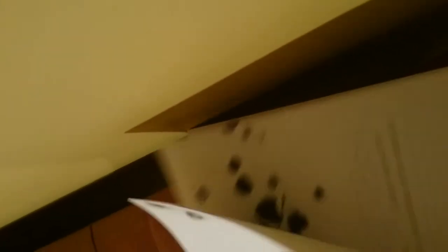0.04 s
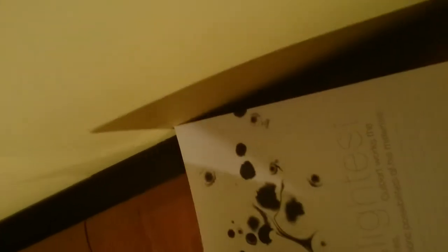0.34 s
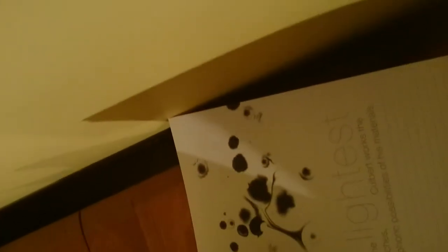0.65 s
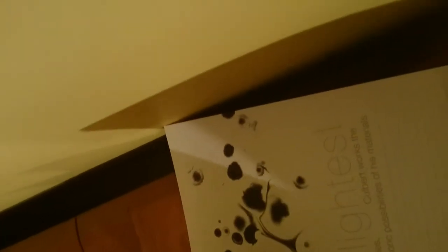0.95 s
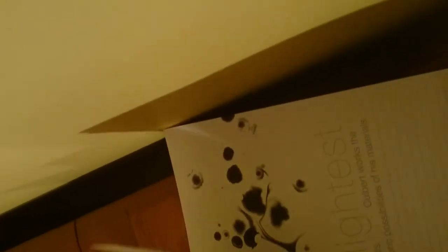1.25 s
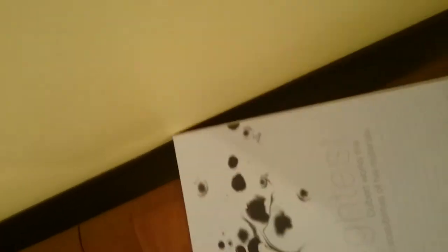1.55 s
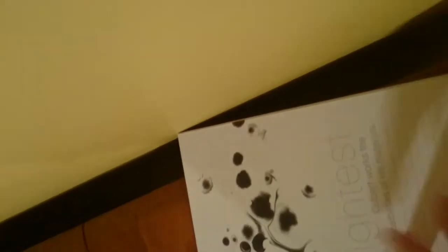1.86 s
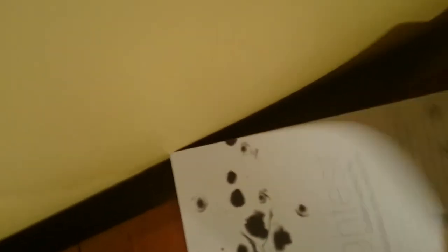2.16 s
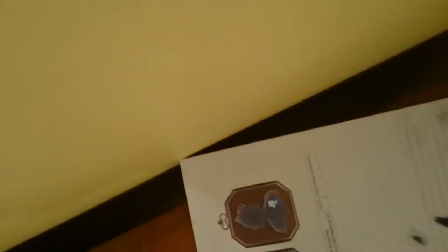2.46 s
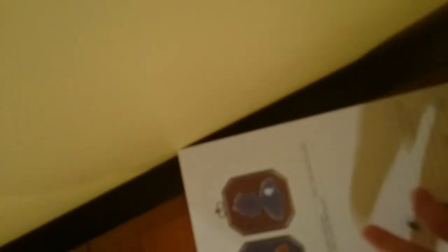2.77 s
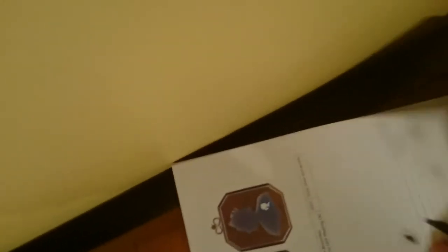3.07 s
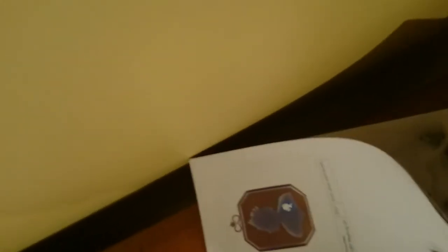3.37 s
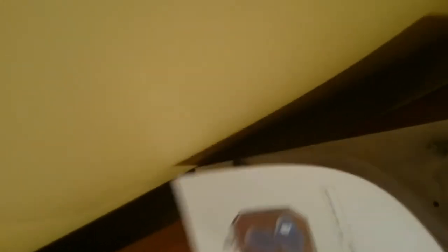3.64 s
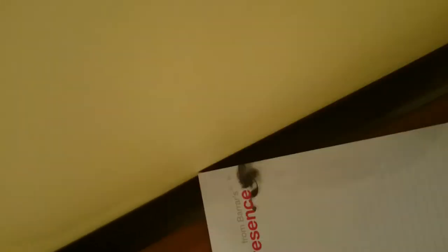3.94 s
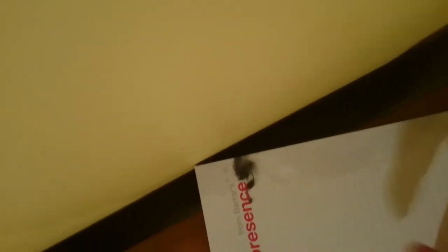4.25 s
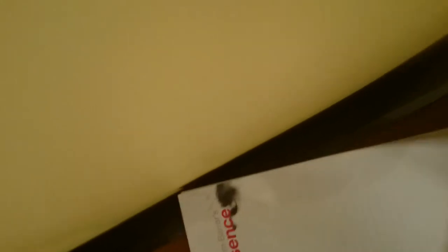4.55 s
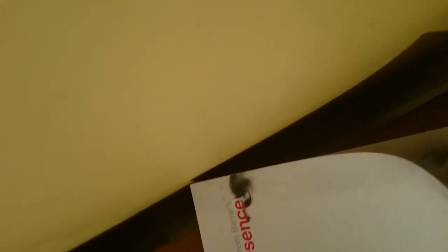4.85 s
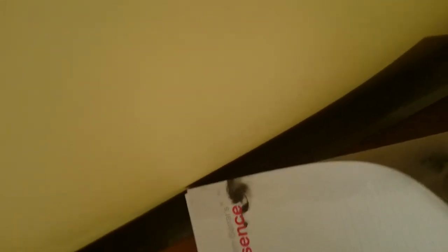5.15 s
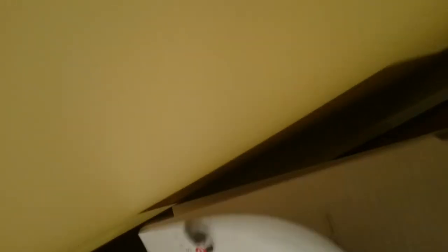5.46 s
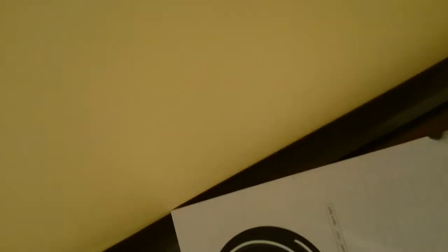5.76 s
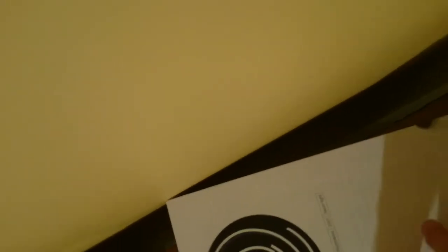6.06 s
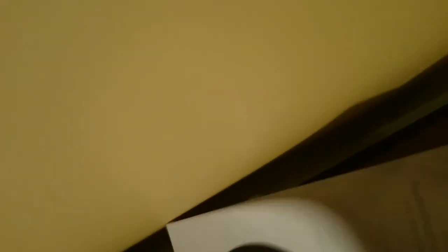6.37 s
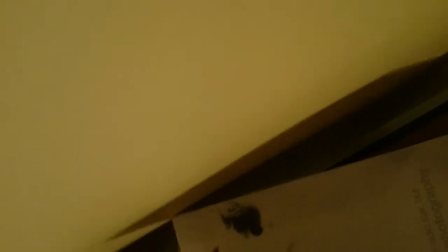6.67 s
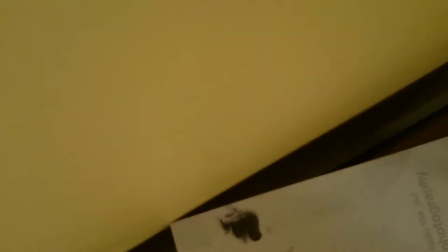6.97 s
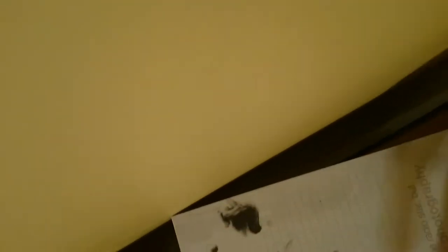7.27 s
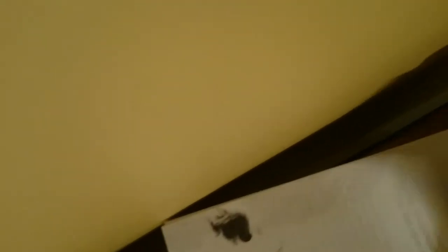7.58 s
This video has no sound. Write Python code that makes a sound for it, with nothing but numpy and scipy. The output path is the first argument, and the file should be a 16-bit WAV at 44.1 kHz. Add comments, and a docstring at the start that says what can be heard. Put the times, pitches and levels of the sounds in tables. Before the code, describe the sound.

Close paper swishes and sharp crackles as someone leafs through a magazine on a table, with soft puffs of air.

```python
"""A quiet room, a small camera close to a wooden table where the pages of a magazine are turned.
Each sheet slides off its neighbour with a grainy hiss, scrapes and brushes past, buckles with snaps
and lands on a hollow pocket of air; glossy paper sticks and slips in squeaks. Soft thumps, puffs and
drifts of air reach mainly the right microphone, whose port also rings in the treble.
Faint room tone and mains hum lie underneath."""
import sys
import numpy as np
from scipy import signal
from scipy.fft import rfft, irfft, next_fast_len
from scipy.io import wavfile
from scipy.ndimage import uniform_filter1d, map_coordinates

SR = 44100
rng = np.random.default_rng(int(sys.argv[2]) if len(sys.argv) > 2 else 0)


def transcribe(u):
    """Save the signal u as a 16-bit wav file named by the first command-line argument.

    u: samples, shape (n,) or (channels, n), limited to [-1, 1]; the rate is SR.
    q: integer samples, one column per channel.
    """
    v = np.clip(np.atleast_2d(u).T, -1, 1)
    q = np.round(v * 32767).astype(np.int16)
    wavfile.write(sys.argv[1], SR, q)


N = 340009


def amp(db):
    """Decibels to gain."""
    return 10 ** (np.asarray(db) / 20)


def unit(x):
    """Scale to rms 1."""
    return x / np.sqrt(np.mean(x ** 2) + 1e-20)


def along(points, hz):
    """Read (f/Hz, value) points on a log frequency axis."""
    f, values = np.transpose(points)
    return np.interp(np.log(hz + 1), np.log(f + 1), values)


def wobble(rate):
    """A smooth random curve with rate knots a second."""
    return map_coordinates(rng.standard_normal(N // 4), [np.arange(N) * rate / SR], mode="wrap")


def filtered(x, response):
    """Filter x by a response given as a function of f/Hz."""
    size = next_fast_len(N + SR // 2)
    return irfft(rfft(x, size) * response(np.fft.rfftfreq(size, 1 / SR)), size)[..., :N]


def noise(spectrum, channels=1):
    """Coloured noise of rms 1."""
    white = rng.standard_normal((channels, N))
    return unit(filtered(white, lambda hz: amp(along(spectrum, hz))))


def coloured(x, spectrum, size=2048):
    """Minimum-phase colouring that keeps the power of white noise."""
    cepstrum = irfft(np.log(amp(along(spectrum, np.fft.rfftfreq(size, 1 / SR)))))
    causal = 2 * cepstrum[:size // 2] * (np.arange(size // 2) > 0)
    response = irfft(np.exp(rfft(causal, size)))
    return signal.fftconvolve(x, response[None] / np.linalg.norm(response), axes=1)[:, :N]


def spread(pair):
    """Two unrelated signals become left and right, alike in the bass."""
    # likeness of the paper at the two microphones: f/Hz, coherence
    coherence = [(100, 1), (400, 0.45), (1200, 0.15), (3000, .15), (10000, .1)]
    angle = lambda hz: np.arccos(np.clip(along(coherence, hz), -1, 1)) / 2
    mid, side = filtered(pair, lambda hz: np.array([np.cos(angle(hz)), np.sin(angle(hz))]))
    return np.array([mid + side, mid - side])


def add(track, s, sound):
    """Mix a sound into a track at s seconds."""
    part = track[..., max(0, round(s * SR)):][..., :sound.shape[-1]]
    part += sound[..., :part.shape[-1]]


def stroke(t, length, rise, fall):
    """A contact that swells, holds for its length and dies away."""
    return (1 - np.exp(-(t / rise) ** 2)) * np.exp(-np.maximum(t - length, 0) / fall)


def shares(flap_db, rub_db, hiss_db, taut_db):
    """Force on the four paper voices; tension moves the rub from the slack voice to the taut one."""
    tension = np.arctan(amp(taut_db))
    return (amp([flap_db, rub_db, rub_db, hiss_db]) * [1, np.cos(tension), np.sin(tension), 1])[:, None]


def contact(flap_db, rub_db, hiss_db):
    """Force of a short contact: the more a sheet hisses over its flap, the tauter it is."""
    return shares(flap_db, rub_db, hiss_db, taut_db=-1.5 + 0.21 * (hiss_db - flap_db))


def voiced(force):
    """Force drives four voices: the whole sheet flaps, it rubs slack or taut, its fibres hiss."""
    # spectrum of each voice: f/Hz, relative density/dB
    flap = [(20, -19), (60, -4), (170, -0.5), (310, 6.5), (450, -8.5), (620, -1), (850, -4), (1200, -4.5),
            (1700, -25.5), (3500, -55.5)]
    slack = [(300, -62), (950, -8.5), (1450, -2.5), (1950, 2), (2700, 2), (3300, 0), (6000, -49.5)]
    taut = [(1200, -49.5), (2400, -7.5), (3000, 5), (4300, -0.5), (5600, -3), (6500, -10.5), (10000, -47)]
    hiss = [(2500, -59), (5000, -9), (6100, -6.5), (7400, -3), (8700, 2.5), (9800, -1.5), (11400, -3.5),
            (12600, -8), (13800, -9), (15000, -16), (16000, -27)]
    return sum(coloured(drive, voice) for drive, voice in zip(force, (flap, slack, taut, hiss)))


def room_tone():
    """The faint steady noise of the room, a little louder on the right."""
    # noise floor: f/Hz, relative density/dB
    spectrum = [(25, -12.5), (55, 4), (80, 1), (250, -9.5), (315, -6), (390, -11), (600, -14.5),
                (1500, -23.5), (3500, -25.5), (6300, -36.5), (9500, -29.5), (14500, -35)]
    return noise(spectrum, channels=2) * amp([[-65], [-62]])


def mains_hum(hz=100, level_db=-77):
    """A faint mains hum in the room, slightly unsteady."""
    return amp(level_db + wobble(3)) * np.sqrt(2) * np.sin(2 * np.pi * hz * np.arange(N) / SR)


def air():
    """Soft puffs and a slow drift of pressure, nearly all on the right microphone."""
    # air pushed by a page onto the microphone: t/s, length/s, level/dB
    puffs = [(0.24, 0.045, -55), (0.46, 0.079, -40), (1.292, 0.11, -50), (2.053, 0.041, -51),
             (2.33, 0.14, -48), (2.475, 0.055, -57), (2.935, 0.094, -40.5), (3.86, 0.044, -39.5),
             (5.099, 0.041, -39.5), (5.44, 0.067, -42), (5.577, 0.044, -55), (5.772, 0.036, -43),
             (6.223, 0.11, -47), (6.533, 0.058, -43), (6.76, 0.064, -36), (6.9, 0.056, -43.5),
             (7.14, 0.063, -46.5)]
    # strength of the drift: t/s, level/dB
    drift_levels = [(0, -8), (.3, -14), (.7, -25.5), (1.1, -20.5), (1.7, -19), (2, -9), (2.3, -19),
                    (3, -12.5), (3.8, -19.5), (4.4, -12.5), (5, -20.5), (5.6, -15), (6.4, -17), (7.7, -8.5)]
    # spectra of puffs and drift: f/Hz, relative density/dB
    puff_spectrum = [(12, -1.5), (30, -2), (60, -0.5), (110, -5), (180, -23.5), (350, -35), (1000, -82.5)]
    drift_spectrum = [(.7, -12.5), (2.5, 7.5), (6, -10.5), (10, 0.5), (14, -17), (20, -22.5), (32, -42.5),
                      (45, -57.5), (90, -55.5), (250, -77.5), (1000, -120)]
    push, t = np.zeros(N), np.arange(SR // 3) / SR
    for s, length, db in puffs:
        add(push, s, amp(db) * stroke(t, length / 2, rise=0.015, fall=0.035))
    drift_db = np.interp(np.arange(N) / SR, *np.transpose(drift_levels))
    drift = unit(np.tanh(noise(drift_spectrum)[0] / np.pi)) * amp(drift_db)
    return push * noise(puff_spectrum) * amp([[-22], [1]]) + drift * amp([[-54], [0]])


def friction(grain_db, flutter_db):
    """Stereo noise of rms 1 in tiny slips, clumped as the contact flutters."""
    hiss = spread(rng.standard_normal((2, N)))
    return unit(hiss * amp(grain_db * wobble(1400) + flutter_db * wobble(90)))


def crinkle(rate, life_s, size_db):
    """Envelope of random tiny creases giving way; a few are much bigger than the rest."""
    kicks = (rng.random(N) < rate / SR) * amp(size_db * np.minimum(rng.exponential(size=N), 3))
    return signal.lfilter([1], [1, -np.exp(-1 / (life_s * SR))], kicks)


def sliding(fade_db=21, fade_curve=1.26):
    """Each slide gathers speed, holds and slows; light touches tick, and a slack sheet crackles."""
    # a sheet slides over its neighbour; the last row is only a brief burst of noise at the very end: # t/s at
    # full speed, rise/s, hold/s, fall/s, flap/dB, rub/dB, hiss/dB, taut over slack/dB
    slides = [(0, 0.068, 0.24, .1, -67, -68, -68.5, -0.5), (0.24, 0.076, .01, 0.16, -57, -59.5, -60, 7),
              (0.491, 0.071, 0.08, 0.093, -57, -45.5, -35.5, 8.5),
              (0.585, .06, 0.087, 0.053, -60, -48, -46.5, 9.5),
              (0.97, 0.2, 0.019, 0.097, -63, -60, -63.5, -7),
              (1.112, 0.054, 0.0085, 0.017, -62, -50.5, -54, 1.5),
              (1.149, 0.013, 0.043, 0.069, -63.5, -52, -56, 4),
              (1.322, 0.071, 0.019, .06, -80, -69.5, -69.5, 2),
              (1.487, 0.038, 0.062, 0.12, -64.5, -57, -57.5, -2.5),
              (1.597, 0.041, 0.04, 0.058, -52, -44.5, -40.5, 1),
              (1.953, 0.022, 0.03, 0.47, -70, -67, -80, -1),
              (2.291, 0.16, 0.0085, 0.13, -65, -55, -41.5, 7),
              (2.292, 0.0096, 0.0064, 0.15, -54, -50, -47.5, 2.5),
              (2.421, 0.13, 0.089, 0.13, -54, -51, -57.5, 1),
              (3.202, 0.29, 0.012, 0.23, -78, -59.5, -56.5, 0.5),
              (3.476, 0.093, 0.022, 0.1, -62.5, -59, -65, -2), (3.548, 0.03, 0.09, 0.06, -66, -63, -62, -1),
              (3.685, 0.023, 0.086, 0.049, -57.5, -35.5, -36.5, 4),
              (3.909, 0.064, 0.06, 0.11, -44.5, -42.5, -45.5, 3),
              (4.686, 0.17, 0.015, 0.086, -76, -56.5, -53.5, 1),
              (4.752, 0.028, 0.01, 0.18, -67.5, -56, -57, 0.5),
              (5.45, 0.14, 0.1, 0.11, -58, -49.5, -56.5, 0),
              (5.664, 0.11, 0.11, 0.17, -54, -54.5, -56.5, 1.5),
              (6.213, 0.057, 0.038, 0.13, -72, -72, -62, -1), (6.415, 0.1, 0.033, 0.23, -69, -58, -46, 7),
              (6.56, 0.31, 0.081, 0.083, -61, -56.5, -58, 2.5),
              (6.77, 0.083, 0.053, 0.12, -56, -53, -72, -0.5),
              (7.032, 0.17, 0.11, 0.098, -53.5, -51, -56.5, 1.5),
              (7.554, 0.053, 0.018, 0.11, -72.5, -65, -56.5, -2), (7.7, 0.072, .01, .05, -58, -59, -48, 4)]
    # a page that is only held: flap/dB, rub/dB, hiss/dB
    held = [-82.5, -88.5, -77]
    t = np.arange(N) / SR
    power = shares(*held, taut_db=1.0) ** 2
    for s, rise, hold, fall, *db in slides:
        away = np.maximum((s - t) / rise, 0) + np.maximum((t - s - hold) / fall, 0)
        swell = amp(-fade_db * np.minimum(away, 5) ** fade_curve)
        power = power + (shares(*db) * swell) ** 2
    flap, hiss = power[0], power[-1]
    lightness = np.clip((-44 - 10 * np.log10(hiss)) / 14, .15, 1)
    ticks = .8 * lightness * crinkle(rate=40, life_s=.0008, size_db=4)
    slack = flap / (flap + hiss)
    crackle = 1.5 * slack * crinkle(rate=110, life_s=.0009, size_db=3)
    return np.sqrt(power * (1 - slack / 2 + ticks ** 2 + crackle ** 2))


def bending(x, depth_db, size=256):
    """As the sheet bends, its resonances and reflections wander across the spectrum."""
    spectra = signal.stft(x, nperseg=size)[2]
    ripple = rng.standard_normal(spectra.shape)
    for axis, width in ((1, 3), (2, 40), (2, 20)):  # smooth over frequency, then twice over time
        ripple = uniform_filter1d(ripple, width, axis)
    return signal.istft(spectra * unit(amp(depth_db * unit(ripple))), nperseg=size)[1][:, :N]


def scrapes():
    """A taut sheet dragged across an edge hisses in a narrow resonance that moves as it bends."""
    # drags across an edge: t/s, length/s, start f/Hz, end f/Hz, width/Hz, level/dB
    drags = [(0.043, 0.02, 5670, 5450, 1200, -57.5), (0.139, 0.028, 5400, 5430, 700, -60.5),
             (0.432, 0.063, 5160, 4690, 1400, -45.5), (0.549, 0.12, 3000, 2286, 1300, -54.5),
             (0.469, 0.12, 4520, 3380, 1900, -47), (0.49, 0.082, 10900, 10560, 1300, -48),
             (0.903, 0.085, 3690, 3620, 1500, -59), (1.474, 0.033, 3900, 3870, 1000, -56),
             (1.584, 0.036, 2750, 3004, 700, -45), (1.594, 0.031, 4300, 5000, 2200, -34.5),
             (1.597, 0.031, 9140, 9860, 1200, -29.5), (1.657, 0.015, 9300, 9260, 1000, -44),
             (2.264, 0.072, 6360, 5780, 1400, -50.5), (2.291, 0.026, 2675, 2720, 900, -50.5),
             (2.425, 0.032, 5500, 4400, 2000, -46), (2.508, 0.021, 9060, 8650, 1000, -47),
             (3.127, 0.12, 6050, 6020, 1300, -65), (3.453, 0.0074, 5220, 5630, 1100, -50.5),
             (3.67, 0.026, 9200, 9100, 1600, -42.5), (4.61, 0.17, 6020, 5900, 900, -64),
             (5.356, 0.023, 5920, 5680, 1600, -35), (5.35, 0.02, 9500, 8340, 2200, -33.5),
             (5.583, 0.018, 9360, 8320, 2600, -39), (6.386, 0.21, 9900, 9300, 1500, -49),
             (7.105, 0.027, 7100, 6900, 800, -52)]
    out, t = np.zeros((2, N)), np.arange(SR // 3) / SR
    for s, length, start_hz, end_hz, width_hz, db in drags:
        phase = 2 * np.pi * np.cumsum(np.interp(t, [0, length], [start_hz, end_hz])) / SR
        lowpass = signal.butter(2, width_hz / 2, fs=SR)
        in_phase, quadrature = signal.lfilter(*lowpass, rng.standard_normal((2, 2, len(t))))
        band = unit(in_phase * np.cos(phase) + quadrature * np.sin(phase))
        add(out, s, amp(db) * stroke(t, length, rise=0.082 * length, fall=0.15 * length) * band)
    return spread(out)


def buckled(force, ring_hz, edge_hz, ring_db=1.5, ring_q=6.7):
    """The patch that flips rings at a pitch set by its size; a softer fold has less treble."""
    patch = signal.lfilter(*signal.iirpeak(ring_hz, ring_q, fs=SR), force)
    soften = signal.butter(4, edge_hz, fs=SR, output="sos")
    return signal.sosfilt(soften, force + amp(ring_db) * patch)


def snapping(slips):
    """Force of the snaps: the sheet flips in one sharp jolt, then shivers briefly."""
    # the sheet buckles or its edge flicks free:
    # t/s, flap/dB, rub/dB, hiss/dB, ring f/Hz, treble edge f/Hz
    snaps = [(0.1976, -41, -43.5, -56, 3900, 14000), (0.23, -42, -43, -51, 3900, 14000),
             (0.2552, -39.5, -44, -38, 4400, 14000), (1.0331, -52, -43, -40.5, 3640, 14000),
             (1.434, -69, -59, -54.5, 7900, 14000), (1.513, -69, -65, -46, 11500, 15000),
             (1.641, -50, -48, -52, 2600, 9000), (1.9426, -50, -44.5, -85, 3200, 12000),
             (1.9511, -51, -48, -49, 2480, 11100), (2.3984, -55, -50, -37, 6200, 10500),
             (2.4852, -50, -31, -34, 9900, 15500), (2.4886, -35.5, -21.5, -28, 4630, 7000),
             (2.589, -48, -53, -52.5, 5300, 14000), (3.436, -68, -59, -55, 9500, 13000),
             (3.441, -76, -63, -54, 10000, 13000), (3.4745, -73, -57, -52, 5500, 13000),
             (3.488, -65, -61, -54, 6000, 13000), (3.508, -70, -68, -54, 9000, 13000),
             (3.515, -68, -59, -53, 8500, 13000), (3.582, -64, -55, -50, 6000, 13000),
             (3.602, -70, -70, -55, 6000, 10000), (3.6093, -55, -64, -45.5, 8200, 14000),
             (3.632, -68, -62, -54, 6000, 11000), (3.8004, -41, -35.5, -31, 1600, 13000),
             (3.8843, -44, -39, -32, 4000, 15500), (3.8992, -31.5, -20.5, -17, 5100, 12840),
             (3.934, -54, -47, -26.5, 8000, 15200), (3.9783, -38, -51, -45, 10000, 14500),
             (3.01, -57.5, -62, -60, 6000, 13000), (5.405, -67, -60, -47, 6000, 12000),
             (5.5975, -37, -43, -28.5, 6000, 12000), (5.686, -56, -63, -53, 6000, 13000),
             (4.851, -65, -70, -47.5, 8800, 14100), (4.9974, -56.5, -57.5, -52, 2080, 14000),
             (5.12, -43, -40.5, -54, 2020, 14000), (5.243, -55.5, -54.5, -57, 4300, 13850),
             (5.4731, -56, -34.5, -47, 2700, 11500), (5.5186, -41, -31.5, -28.5, 6200, 15000),
             (5.5389, -42, -33, -40, 2400, 13000), (5.7146, -59, -38.5, -32, 7850, 13900),
             (5.728, -47, -42, -29.5, 7000, 12100), (5.795, -31.5, -38, -28, 6100, 12900),
             (5.8256, -46, -62, -49, 8960, 13000), (5.852, -39, -59, -53, 7740, 13060),
             (6.579, -43, -48, -35.5, 9100, 10400), (6.7198, -74, -39.5, -34.5, 7600, 10900),
             (6.734, -70, -44, -42, 9600, 14000), (6.7444, -42.5, -31, -25.5, 8300, 10100),
             (6.7466, -53, -27, -19.5, 5140, 7000), (6.7974, -34, -28.5, -31.5, 5360, 16000),
             (6.8045, -45, -33, -25, 5560, 15000), (6.8305, -31.5, -27, -31, 8200, 13000),
             (6.859, -60, -59, -39.5, 6200, 14000), (6.903, -60, -52, -52, 6000, 10000),
             (6.9664, -47, -36.5, -30.5, 7340, 12600), (7.052, -67, -64, -45, 6000, 14000),
             (7.1278, -40, -33.5, -22, 6480, 15400), (7.496, -57, -54, -41.5, 6000, 13000)]
    force, t = np.zeros((4, 2, N)), np.arange(SR // 20) / SR
    shiver = (0.95 * np.exp(-t / 0.0012) + 0.15 * np.exp(-t / 0.008)) * (1 - np.exp(-t / .0001))
    jolt = amp([[15], [16], [14.5], [12.5]]) * (t == 0)  # one impulse per voice
    for s, *db, ring_hz, edge_hz in snaps:
        motion = jolt[:, None] + shiver * slips[:, round(s * SR):][:, :len(t)]
        add(force, s, buckled(contact(*db)[:, None] * motion, ring_hz, edge_hz))
    return force


def brushing():
    """Force of the short strokes; the longer ones swell more slowly."""
    # an edge or a landing page brushes past: t/s, length/s, flap/dB, rub/dB, hiss/dB
    brushes = [(0.246, 0.052, -81, -49.5, -48), (0.362, 0.023, -64, -61, -52.5),
               (0.748, 0.053, -65.5, -55, -60.5), (0.809, 0.034, -90, -58.5, -62.5),
               (0.851, 0.014, -84, -56.5, -66), (1.599, 0.046, -60, -38.5, -33),
               (1.71, 0.026, -72, -60.5, -58.5), (2.424, 0.027, -76, -47, -44),
               (2.474, 0.013, -45, -41, -45), (2.509, 0.019, -48, -57, -45.5),
               (3.253, 0.036, -60, -52.5, -52.5), (3.301, 0.011, -61, -67, -56),
               (3.379, 0.006, -62, -57.5, -57), (3.406, 0.014, -66, -61, -60),
               (3.447, 0.0095, -56, -50.5, -46.5), (3.836, 0.015, -45.5, -33, -30.5),
               (3.883, 0.008, -39, -30, -34), (3.913, 0.0092, -33.5, -55, -45),
               (4.008, 0.0059, -46, -42.5, -53), (4.036, 0.025, -49.5, -68, -46),
               (4.553, 0.063, -67.5, -57, -61), (5.117, 0.0079, -63, -48, -48),
               (5.166, 0.022, -54, -46, -41), (5.349, 0.043, -62, -39, -42.5),
               (5.437, 0.014, -53, -34, -33), (5.472, 0.0087, -62, -40, -38.5),
               (5.533, 0.013, -48, -40, -41), (5.585, 0.034, -45, -40.5, -45),
               (5.633, 0.018, -53, -47, -46.5), (5.698, 0.025, -63, -49, -48),
               (5.73, 0.006, -67, -41.5, -44), (5.77, 0.035, -59, -45, -42.5),
               (6.182, 0.013, -75, -66, -61), (6.796, 0.0053, -52, -51, -34.5),
               (6.829, 0.0047, -60, -39, -34.5), (6.965, 0.0087, -55, -40, -50),
               (7.095, 0.058, -54, -51, -42.5), (7.167, 0.03, -50.5, -68, -63)]
    force, t = np.zeros((4, N)), np.arange(SR // 8) / SR
    for s, length, *db in brushes:
        add(force, s - 0.27 * length, contact(*db) * stroke(t, length, rise=0.33 * length, fall=0.0048))
    return force


def paper():
    """Grainy friction on a bending sheet, and the snaps of its buckling."""
    slips = friction(grain_db=2.0, flutter_db=1.1)
    pressure = np.hypot(sliding(), brushing())
    rustle = bending(voiced(pressure[:, None] * slips), depth_db=2.0)
    return rustle + voiced(snapping(slips))


def landings():
    """The air trapped under a landing page rings briefly, hollow and unsteady in pitch."""
    # air pockets: t/s, length/s, f/Hz, level/dB
    pockets = [(0.257, 0.0064, 610, -48), (2.4874, 0.007, 670, -33.5), (2.488, 0.0038, 1255, -35.5),
               (3.797, 0.0024, 1400, -34.5), (3.833, 0.014, 1082, -41.5), (3.892, 0.012, 760, -32),
               (3.902, 0.016, 1234, -31.5), (5.118, 0.005, 1354, -43), (5.601, 0.013, 1000, -37.5),
               (5.65, 0.011, 1254, -45), (5.794, 0.0042, 220, -35.5), (6.7975, 0.007, 200, -41),
               (6.831, 0.0061, 790, -43.5), (7.163, 0.016, 841, -43)]
    out, t = np.zeros(N), np.arange(SR // 10) / SR
    unsteady = wobble(700)
    for s, length, hz, db in pockets:
        pitch = hz * (1 + .25 * unsteady[round(s * SR):][:len(t)])
        tone = np.sin(2 * np.pi * np.cumsum(pitch) / SR)
        add(out, s, amp(db) * stroke(t, length, rise=0.0007, fall=.0035) * tone)
    return out * unit(amp(2.2 * wobble(500)))


def thumps(bobs=3, half_width_s=0.0043, rebound_s=0.03, rebound_db=-8):
    """The jolted magazine bobs, sending ever weaker round pulses mostly to the right microphone."""
    # jolts of the hand: t/s, level/dB
    jolts = [(0.4591, -18.5), (2.066, -22.5), (2.352, -60), (2.95, -18), (6.235, -32), (6.785, -27)]
    out, t = np.zeros(N), np.arange(N) / SR
    for s, db in jolts:
        for bob in range(bobs):
            out += amp(db + bob * rebound_db) / (1 + ((t - s - bob * rebound_s) / half_width_s) ** 2)
    return out * amp([[-24], [0]])


def squeaks(octave_db=-22.5, rasp_db=-14.5, rough_db=-0.5):
    """Glossy paper sticks and slips thousands of times a second, in an uneven, rasping glide."""
    # runs of stick-slip: t/s, length/s, start f/Hz, target f/Hz, level/dB, pitch scatter/Hz
    glides = [(1.342, 0.013, 3800, 3950, -62, 220), (3.843, 0.0092, 4900, 4240, -33.5, 300),
              (3.9343, 0.0035, 7600, 6800, -16.5, 160), (3.9394, 0.0053, 6900, 6750, -17.5, 100),
              (3.9486, 0.0042, 6740, 6420, -25.5, 160)]
    # rasp of the slips: f/Hz, relative density/dB
    rasp_spectrum = [(1000, -26.5), (3500, -10), (6500, 3), (9500, 6.5), (11500, -6), (14000, 0.5),
                     (16000, -12.5)]
    out, t = np.zeros(N), np.arange(SR // 8) / SR
    unsteady, rasp = wobble(1500), noise(rasp_spectrum)[0]
    for s, length, start_hz, target_hz, db, scatter_hz in glides:
        here = slice(round(s * SR), round(s * SR) + len(t))
        hz = target_hz + (start_hz - target_hz) * np.exp(-2 * t / length) + scatter_hz * unsteady[here]
        phase = 2 * np.pi * np.cumsum(hz) / SR
        swell = stroke(t, 0.94 * length, rise=0.1 * length, fall=0.34 * length)
        slips = np.sin(phase) + amp(octave_db) * np.sin(2 * phase) + amp(rasp_db) * rasp[here]
        add(out, s, amp(db) * np.sqrt(2) * swell * slips)
    return out * unit(amp(rough_db * wobble(1800)))


def table_reflection(x, path_s, sway_s, share):
    """Table and neighbouring page reflect the sound over a path that changes as the sheet moves."""
    delays = np.abs(path_s + sway_s * wobble(7)) + 1e-4 * np.array([wobble(2.8), wobble(2.5)])
    now = np.arange(N)
    echo = np.array([map_coordinates(side, [now - delay * SR]) for side, delay in zip(x, delays)])
    return (x + share * echo) / np.sqrt(1 + share ** 2)


def room(x, size=256):
    """The short tail of a small furnished room; its treble dies first."""
    # reverberation: f/Hz, time to fall by 60 dB/s
    t60 = [(200, 0.24), (2000, 0.26), (7000, 0.12), (14000, 0.19)]
    hz, t, spectra = signal.stft(rng.standard_normal((2, SR // 3)), SR, nperseg=size)
    tail = signal.istft(spectra * amp(-60 * t / along(t60, hz)[:, None]), SR, nperseg=size)[1]
    tail *= 1 - np.exp(-np.arange(tail.shape[1]) / (0.012 * SR))
    return signal.fftconvolve(x, tail / np.linalg.norm(tail[0]), axes=1)[:, :N]


def microphone_ports(x, lag_s):
    """The right port colours the sound and hears it a little later."""
    # the right port against the left: f/Hz, gain/dB
    colour = [(300, 6.5), (700, 0.5), (1400, -1.5), (2100, 3), (2900, -3.5), (4000, 1), (5000, 1),
              (5900, 7), (7000, -1), (8000, -11), (9000, -19), (11500, -15), (13000, -13), (15000, -0.5)]
    right = lambda hz: amp(along(colour, hz)) * np.exp(-2j * np.pi * hz * lag_s)
    return filtered(x, lambda hz: np.array([np.ones_like(hz), right(hz)]))


def scene():
    """Close pages and a little of the room pass the ports, over moving air, hum and room tone."""
    pages = table_reflection(paper(), path_s=.0016, sway_s=.0004, share=0.56)
    pages = pages + landings() + squeaks() + scrapes()
    heard = microphone_ports(pages + amp(-16) * room(pages), lag_s=.000022)
    return heard + air() + thumps() + mains_hum() + room_tone()


def record(dry):
    """The camera cuts off steeply at its band limit."""
    top_hz = 15700
    return filtered(dry, lambda hz: 1 / (1 + (hz / top_hz) ** 200))


dry = scene()
out = record(dry)
transcribe(out)
```